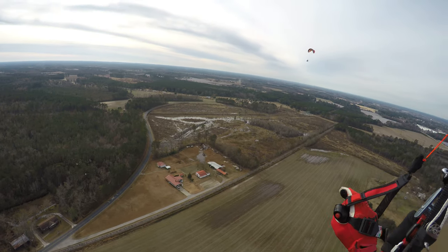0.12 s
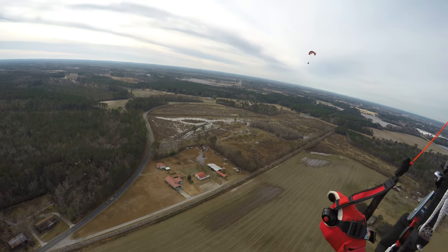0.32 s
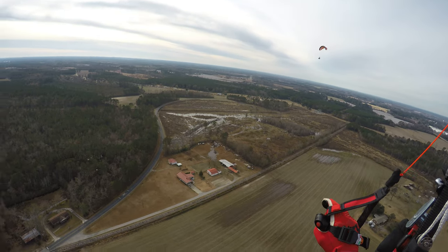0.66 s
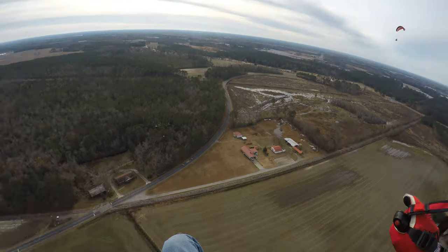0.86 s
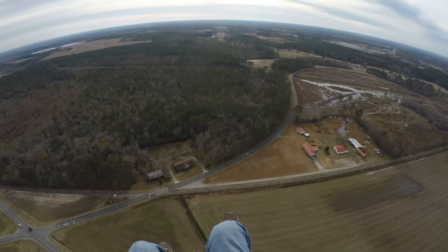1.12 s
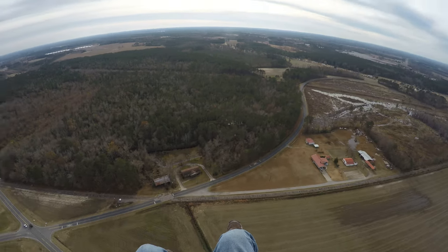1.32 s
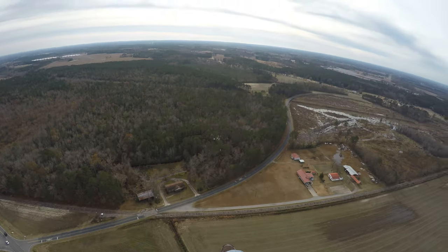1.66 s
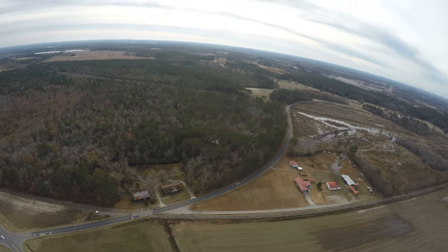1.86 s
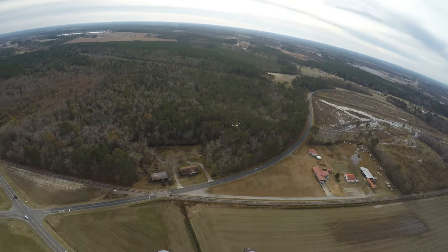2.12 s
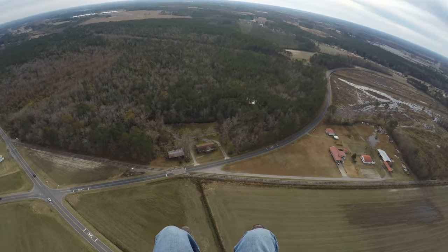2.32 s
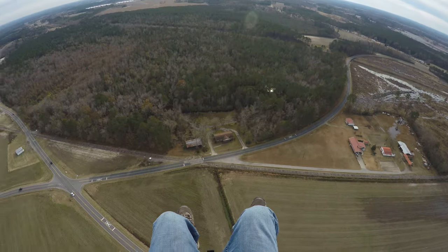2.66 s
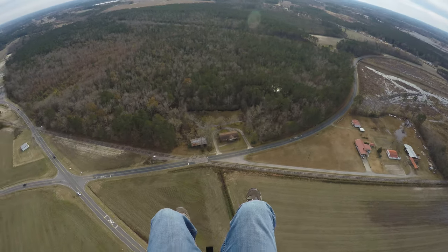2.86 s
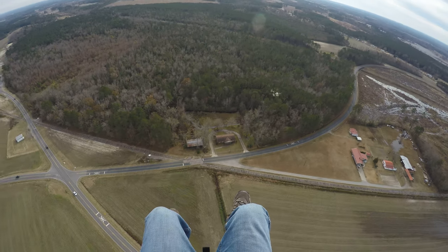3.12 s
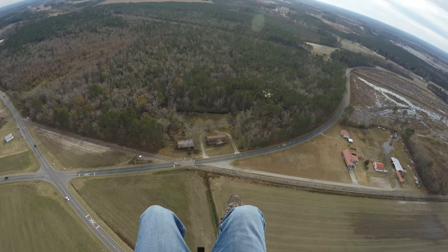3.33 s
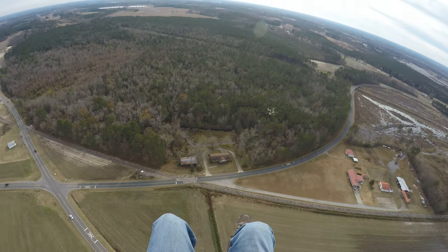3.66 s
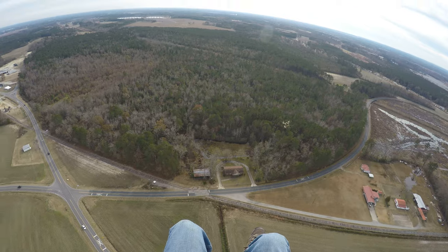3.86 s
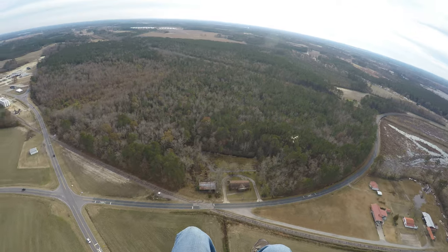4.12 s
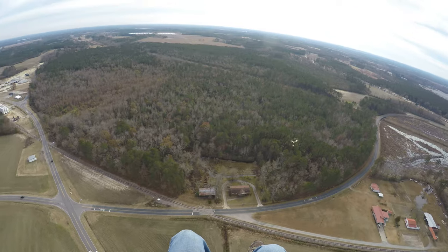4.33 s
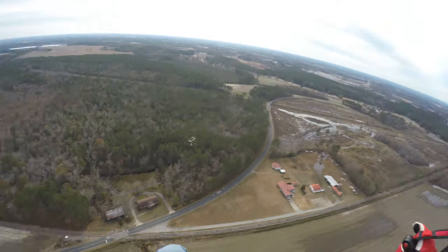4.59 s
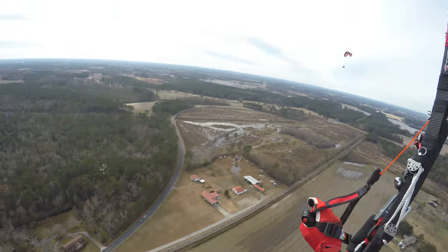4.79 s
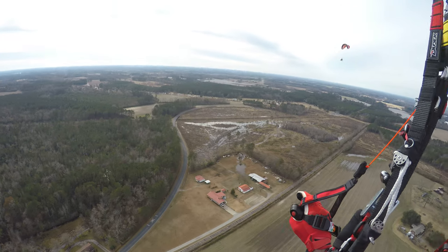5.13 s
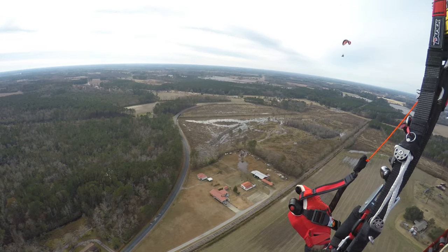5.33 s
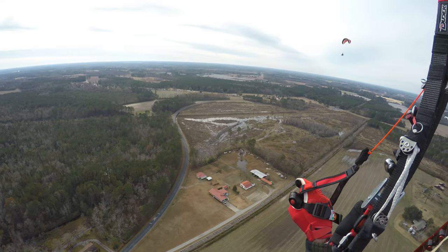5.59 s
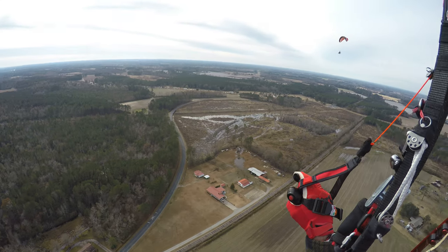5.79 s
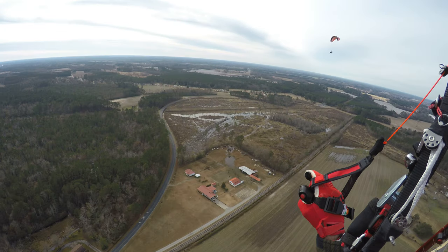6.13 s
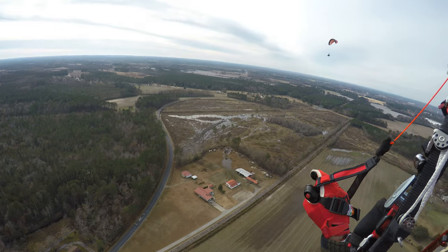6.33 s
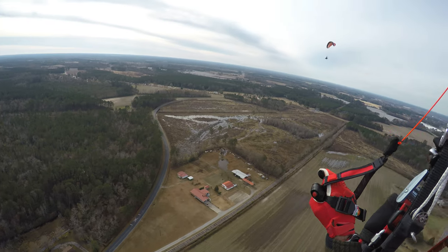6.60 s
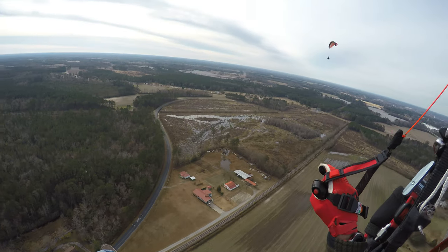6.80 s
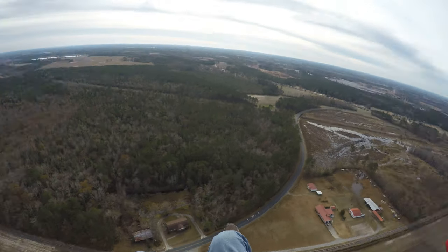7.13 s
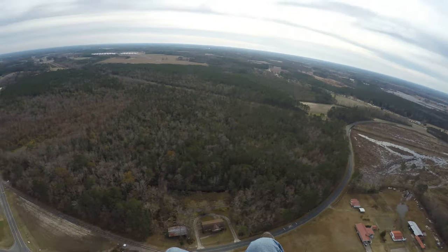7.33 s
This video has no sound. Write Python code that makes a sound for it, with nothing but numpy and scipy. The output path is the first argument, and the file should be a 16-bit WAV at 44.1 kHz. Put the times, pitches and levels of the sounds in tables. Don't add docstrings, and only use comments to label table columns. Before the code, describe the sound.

A small two-stroke engine drones without pause, a raspy buzz of about 70 to 77 pulses a second, muffled by a sealed helmet case in open air. From 0 to 0.9 s low wind rumbles and moans over it. Around 1 s the head turns with a soft low slap; wind drops away, and from 1.5 to 2.5 s the engine swells, louder and harsher, with metallic rattling and scattered knocks. From 2.6 to 3.9 s it settles into a steadier, slightly lower buzz. At 4.0 to 4.4 s a cluster of hard, dry knocks shakes the frame. By 4.8 s wind returns with low thumps, hollow and gusty through 7 s, over a quieter engine whose pitch slowly rises, with faint clicks. After 7.2 s wind fades and a bright, clattering engine surges until the end. Thin hiss, tiny rapid electronic ticks and a barely audible whine persist.

```python
import sys
import numpy as np
from scipy import signal
from scipy.fft import rfft, irfft, next_fast_len
from scipy.io import wavfile
from scipy.ndimage import uniform_filter1d

SR = 44100
rng = np.random.default_rng(int(sys.argv[2]) if len(sys.argv) > 2 else 0)


def ratio_of_db(decibels):
    return 10 ** (np.asarray(decibels, float) / 20)


def int16_out(signal):
    q = np.round(np.clip(np.atleast_2d(signal).T, -1, 1) * 32767)
    wavfile.write(sys.argv[1], SR, q.astype(np.int16))


N = 329030
T = np.arange(N) / SR
FAST = next_fast_len(N)


def curve(rows):
    s, *columns = np.transpose(rows)
    return [np.interp(T, s, c) for c in columns]


def evened(x):
    return x / np.sqrt(np.mean(x ** 2, -1, keepdims=True) + 1e-20)


def coloured(x, points):
    f, db = np.transpose(points)
    hz = np.fft.rfftfreq(FAST, 1 / SR)
    gain = ratio_of_db(np.interp(np.log(hz + 1), np.log(f + 1), db))
    return irfft(rfft(x, FAST) * gain, FAST)[..., :N]


def wander(top_hz, count=1, size=N):
    knots = rng.standard_normal((count, 4000))
    hz = np.fft.rfftfreq(4000, T[-1] / 4000)
    lowpass = (hz > 0) / (1 + (hz / top_hz) ** 4)
    slow = evened(irfft(rfft(knots) * lowpass, 4000))
    at = np.linspace(0, 3999, size)
    return np.array([np.interp(at, np.arange(4000), s) for s in slow])


def resonate(x, hz, width):
    carrier = np.exp(2j * np.pi * np.cumsum(hz * np.ones(N)) / SR)
    r = np.exp(-np.pi * width / SR)
    return 2 * (carrier * signal.lfilter([1 - r], [1, -r], x / carrier)).real


def ring(hz, t60, rise_s=.0007):
    t = np.arange(1500) / SR
    envelope = ratio_of_db(-60 * t / t60) * (1 - np.exp(-t / rise_s))
    return envelope * 2 * np.sin(2 * np.pi * hz * t)


def head():
    hold_s = [0, .82, 1.1, 1.55, 1.75, 2.25, 2.6, 3.1, 3.6, 4.62, 5.0, 6.2, 6.55, 7.25, 7.37]
    held = [0, 0, 1, 1, 2, 2, 3, 3, 4, 4, 5, 5, 6, 6, 7]
    return np.array([np.interp(T, hold_s, np.equal(held, k)) for k in range(8)])


def buffeting():
    # start in seconds, extra rattle in dB, length in seconds.
    bumps = [(1.387, 7, 0.29), (1.593, 3, 0.061), (1.837, 6.5, 0.032), (1.982, 0, 0.036), (2.08, -4, 0.047),
             (2.447, 14, 0.026), (3.99, 13, 0.07), (4.132, 15, 0.044), (4.177, 14, 0.09),
             (4.343, 16, 0.055), (4.44, 7, 0.06), (4.545, 10, 0.037), (6.124, -1, 0.041), (6.878, 15.5, .1),
             (7.31, 4, 0.045)]
    rise_s = 0.0087
    shaking = np.zeros(N)
    for s, db, length in bumps:
        rise = np.clip((T - s) / rise_s, 0, 1)
        shaking += db * rise * np.exp(-(np.maximum(T - s, 0) / length) ** 2)
    return shaking


def engine():
    # time in seconds, firing rate in Hz.
    speed = [(0.0, 71.83), (0.64, 71.91), (0.89, 73.08), (1.2, 74.1), (1.49, 74.52), (1.74, 75.31),
             (2.18, 74.09), (2.55, 73.24), (2.95, 72.05), (3.47, 71.15), (4.49, 70.92), (4.78, 70.06),
             (4.97, 71.21), (5.3, 72.65), (5.63, 73.7), (6.55, 76.04), (6.7, 75.46), (7.46, 76.62)]
    # time in seconds, engine level in dB.
    shading = [(0.0, -56), (0.41, -57.5), (0.62, -57), (0.95, -57.5), (1.16, -59.5), (1.58, -55),
               (1.85, -50.5), (2.16, -49.5), (2.66, -53), (3.61, -53), (4.1, -51.5), (4.43, -50.5),
               (4.78, -54), (5.3, -57.5), (6.11, -55), (6.63, -56), (7.19, -55.5), (7.46, -51)]
    # time in seconds, lateness in turns.
    delay = [(0, -.05), (.69, .12), (1.1, .2), (1.77, .3), (2.7, .34), (4.6, .32), (4.93, .14), (6.1, .13),
             (6.6, .17), (7.13, .13), (7.46, .18)]
    # level against the engine in dB,
    # one for each head position.
    tone_levels = [-4, 0, -1, -2.5, -2.5, -6, -3.5, 3]
    puff_levels = [-4.5, -1, -6, -3, -3, -7, -4.5, -9]
    rattle_levels = [-8, -4.5, 3, -4.5, -4.5, -2, -7.5, 6.5]
    treble_levels = [-12, 2, -13, -12, -12.5, -16.5, -25, -7]
    turns = np.cumsum(curve(speed)[0]) / SR - curve(delay)[0]
    shares = head()
    balance = np.array([tone_levels, puff_levels, rattle_levels, treble_levels]) @ shares
    tone_db, puff_db, rattle_db, treble_db = balance
    shaking = buffeting() + 1.0 * wander(8., count=2)
    body = np.sqrt(2) * ratio_of_db(tone_db) * exhaust_tone(turns, shares) + ratio_of_db(puff_db) * exhaust_puffs(turns)
    left = shares[2] + shares[7]
    rattle = clatter(turns, rattle_db + .75 * shaking[0], treble_db + .95 * shaking[1], left)
    struck = ratio_of_db(0.43 * shaking[0]) * blows(turns, shares)
    return ratio_of_db(curve(shading)[0] + 2.5) * (body + rattle + struck) + knocks()


def exhaust_tone(turns, shares):
    # multiple of the firing rate, level in dB.
    right_a = [(1, -14), (2, -12), (3, -18), (4, -14), (5, -13), (6, -7), (7, -4.5), (8, -14), (9, -7.5),
               (10, -0.5), (11, -7.5), (12, -5), (13, -6.5), (14, -14), (15, -8.5), (16, -12), (17, -15),
               (18, -11), (19, -8), (20, -8.5), (21, -13), (22, -3), (23, -20), (24, -6), (25, -24),
               (26, -28), (27, -12), (28, -31), (29, -22), (30, -12)]
    turning = [(1, -18), (2, -28), (3, -27), (4, -11), (5, -7), (6, -3), (7, -9), (8, -2), (9, -8.5),
               (10, -10), (11, -2.5), (12, 0), (13, -16), (14, -7), (15, -8), (16, -7), (17, -11), (18, -8),
               (19, -1.5), (20, -13), (21, -3.5), (22, -11), (23, -10), (24, -29), (25, -24), (26, -31),
               (27, -9), (28, -7), (29, -19), (30, -6)]
    left_a = [(1, -20), (2, -16.5), (3, -16), (4, -12.5), (5, -5.5), (6, -4.5), (7, -6), (8, -4), (9, -32),
              (10, -9), (11, 1), (12, -19), (13, 2), (14, -17), (15, 3.5), (16, -4.5), (17, -16), (18, -15),
              (19, -16), (20, -5), (21, -25), (22, -16), (23, -23), (24, -11), (25, -4), (26, -6),
              (27, -19), (28, -20), (29, -19), (30, -3.5)]
    down_a = [(1, -22), (2, -18.5), (3, -17.5), (4, -9), (5, -4), (6, -3.5), (7, -5.5), (8, -0.5), (9, -7),
              (10, -6), (11, 1.5), (12, -2.5), (13, -30), (14, -6), (15, -2), (16, -9), (17, -12),
              (18, -14), (19, -17), (20, -6.5), (21, -5), (22, -8), (23, -13), (24, -23), (25, -27),
              (26, -21), (27, -23), (28, -23), (29, -33), (30, -7.5)]
    down_b = [(1, -15), (2, -16.5), (3, -24), (4, -6), (5, -4), (6, 0), (7, 1.5), (8, -3.5), (9, -6.5),
              (10, -6), (11, 3), (12, 1.5), (13, -25), (14, -11.5), (15, 0), (16, -2.5), (17, -12),
              (18, -6), (19, -5.5), (20, -9.5), (21, -6.5), (22, -1), (23, -12), (24, -7), (25, -9),
              (26, -17), (27, -35), (28, -26), (29, -17), (30, -7)]
    right_b = [(1, -22), (2, -1), (3, -23), (4, -10.5), (5, -7.5), (6, -7), (7, -3.5), (8, -5), (9, -3.5),
               (10, -9.5), (11, -4), (12, -1), (13, -3.5), (14, 3), (15, 1.5), (16, -5), (17, -9.5),
               (18, -11.5), (19, -23), (20, -5), (21, -9), (22, -1), (23, -1.5), (24, -18), (25, -12),
               (26, -31), (27, -5), (28, -32), (29, -22), (30, -16)]
    right_c = [(1, -30), (2, -21), (3, -11), (4, -8.5), (5, -15), (6, -6), (7, -5.5), (8, -7), (9, -7.5),
               (10, -1), (11, -2.5), (12, -0.5), (13, -5), (14, -8), (15, -6), (16, -11), (17, -11),
               (18, -14), (19, -8), (20, -10), (21, -7), (22, -9), (23, -16), (24, -15), (25, -32),
               (26, -10), (27, -14), (28, -8), (29, -15), (30, -7)]
    left_b = [(1, -22), (2, -30), (3, -19), (4, -16), (5, -17), (6, -6.5), (7, -8), (8, -4.5), (9, -20),
              (10, -8), (11, -6), (12, -16), (13, -1), (14, -12), (15, 5.5), (16, -30), (17, -3), (18, -8),
              (19, -7), (20, -22), (21, -21), (22, -25), (23, -22), (24, -11), (25, -24), (26, -29),
              (27, -14), (28, -21), (29, -23), (30, -3)]
    positions = [right_a, turning, left_a, down_a, down_b, right_b, right_c, left_b]
    turns, shares = turns[::8], shares[:, ::8]
    gains = ratio_of_db(np.array(positions)[:, :, 1])
    gains /= np.linalg.norm(gains[:, 4:20], axis=1, keepdims=True)
    flutter = wander(55.0, count=30, size=len(turns))
    slip = wander(5.8, count=30, size=len(turns))
    multiple = np.arange(1, 31)[:, None]
    start = rng.random((30, 1)) * np.minimum(multiple / 9, 1) ** 2.5
    phase = multiple * (turns + .0035 * slip) - .6 * multiple + start
    lines = gains.T @ shares * ratio_of_db(2.1 * flutter) * np.cos(2 * np.pi * phase)
    return signal.resample_poly(lines.sum(0), 8, 1)[:N]


def exhaust_puffs(turns):
    # frequency in Hz, density in dB per Hz.
    puff_colour = [(120, -67), (200, -19), (390, -22.5), (427, -21.5), (672, -10), (788, -13), (934, -9.5),
                   (1070, -11), (3400, -15), (3900, -61), (6600, -120)]
    stroke_db = 2.0 * rng.standard_normal(int(turns[-1]) + 1)[turns.astype(int)]
    gate = .3 + ratio_of_db(stroke_db) * np.exp(-((turns + .22) % 1) / .25)
    return evened(coloured(gate * rng.standard_normal(N), puff_colour))


def blows(turns, shares):
    # place in turns, ring in Hz, t60 in seconds.
    impacts = [
        (.95, 2650, .0045),
        (.39, 2300, .006),
        (.76, 3000, .005),
        (.83, 1750, .008),
        (.4, 1300, .008),
    ]
    strength = [
        [-12, -19, -24, -16, -21, -9, -11, -15],
        [-15, -22, -11, -20, -15, -21, -21, -20],
        [-26, -15, -11, -16, -12, -26, -24, -17],
        [-16, -12, -12, -11, -12, -21, -12, -8],
        [-19, -21, -19, -21, -19, -11, -18, -21],
    ]
    spread_db, jitter = 2.4, .002
    strokes = np.arange(1, int(turns[-1]) - 1)
    out = np.zeros(N)
    for (place, hz, t60), gain in zip(impacts, ratio_of_db(np.array(strength) @ shares)):
        luck = np.clip(rng.standard_normal((len(strokes), 2)), -2, 2)
        train = np.zeros(N)
        at = np.searchsorted(turns, strokes + place + jitter * luck[:, 0])
        train[at] = ratio_of_db(spread_db * luck[:, 1])
        out += gain * evened(signal.oaconvolve(train, ring(hz, t60, .00025)[:500])[:N])
    return out


def clatter(turns, body_db, treble_db, left):
    # frequency in Hz, level in dB.
    part_colour = [(400, -24.5), (800, -16), (1500, -6), (2200, -1), (2600, 4), (3000, 13), (3500, 17)]
    # time in seconds, pitch in Hz, level in dB.
    cavity_path = [(1.2, 2570, -24), (1.5, 2150, 2), (1.85, 1938, -13), (2.2, 1770, -21), (2.5, 1470, 5),
                   (2.8, 1530, -6), (7.1, 1640, -31), (7.46, 1880, -7)]
    # pitch in Hz, width in Hz, level in dB.
    shell_modes = [
        (970, 29, -25),
        (1170, 120, -15),
    ]
    stroke = ratio_of_db(1.3 * rng.standard_normal(int(turns[-1]) + 1))[turns.astype(int)]
    firing = 1.1 * np.exp(-((turns + .24) % 1) / .14)
    rebound = .4 * np.exp(-((turns + .62) % 1) / .07)
    shaken = (.2 + firing + rebound) * stroke
    hits = rng.random(N) < 6000 * shaken / SR
    force = ratio_of_db(1.8 * np.minimum(rng.exponential(1, N), 3)) * hits
    part = rng.integers(0, 12, N)
    rings = np.zeros(N)
    for k, hz in enumerate(np.geomspace(600, 3500, 12)):
        rings += signal.oaconvolve(force * (part == k), ring(hz, 0.009))[:N]
    both = coloured(rings, part_colour)
    highpass = signal.butter(3, 2400, "high", fs=SR, output="sos")
    treble = signal.sosfiltfilt(highpass, both)
    cavity_hz, cavity_db = curve(cavity_path)
    cavity = ratio_of_db(cavity_db) * evened(resonate(resonate(both, cavity_hz, 210.0), cavity_hz, 260.0))
    shell = left * sum(ratio_of_db(db) * evened(resonate(rings, hz, width)) for hz, width, db in shell_modes)
    body = ratio_of_db(body_db - 6.5) * (evened(both - treble) + cavity)
    return shell + body + ratio_of_db(treble_db - 12.5) * evened(treble)


def knocks():
    # start in seconds, peak in dB, main ring in Hz, second ring in Hz.
    jolts = [(1.065, -37.5, 1960, 880), (1.602, -28, 2040, 825), (1.683, -35, 1930, 606),
             (1.711, -45, 1950, 740), (1.764, -34, 1220, 1300), (1.79, -37, 1950, 1130),
             (1.871, -35, 1900, 1120), (1.886, -30.5, 1000, 1900), (1.914, -40, 1000, 1950),
             (1.923, -33, 2950, 960), (1.972, -30, 2440, 990), (2.048, -40, 2880, 990),
             (2.059, -42, 1750, 960), (2.072, -37, 1780, 1110), (1.992, -31, 1300, 2900),
             (2.099, -31.5, 1150, 1780), (2.27, -35, 1530, 1100), (2.371, -35, 1600, 1150),
             (2.396, -31.5, 1525, 1124), (2.465, -29.5, 1670, 1110), (2.629, -40, 1680, 630.6),
             (2.699, -37, 789, 1512), (4.028, -30.5, 1400, 660), (4.054, -30, 2460, 1490),
             (4.139, -27, 1700, 3250), (4.166, -30, 3170, 1480), (4.177, -43, 680, 523),
             (4.18, -26, 1490, 655), (4.194, -34, 1310, 2850), (4.209, -39, 1900, 2870),
             (4.221, -27.5, 3020, 1440), (4.334, -31, 1440, 1130), (4.363, -31, 2880, 1580),
             (5.414, -42, 2470, 3200), (5.441, -38, 2580, 669), (5.469, -40, 2550, 3200),
             (5.551, -41, 2520, 3080), (5.633, -44, 2500, 3200), (5.904, -36.5, 3130, 2427),
             (6.118, -34.5, 2907, 2320), (6.761, -41, 980, 1530), (7.225, -32, 776, 1460),
             (7.238, -38, 732, 1470), (7.28, -37, 800, 1451), (7.306, -44, 1130, 2000),
             (7.331, -38, 796, 1800), (7.317, -34, 664, 2500), (7.354, -43, 1130, 1760),
             (7.434, -43, 1744, 1151), (7.448, -29, 1080, 1770)]
    out = np.zeros(N + 1500)
    for s, db, main_hz, second_hz in jolts:
        rings = ring(main_hz, .012, .0003) + ratio_of_db(-6) * ring(second_hz, .018)
        out[round(s * SR):][:1500] += ratio_of_db(db - 6.5) * rings
    return out[:N]


def wind():
    # time in seconds, level in dB, moan in Hz, moan against the rumble in dB.
    gusts = [(0.0, -55.5, 105, -2), (0.45, -58.5, 108, -2), (0.62, -55, 145, -4.5), (0.79, -53.5, 168, 4),
             (0.9, -58.5, 148, 2.5), (1.0, -63, 177, -21), (1.15, -69, 177, -7), (3.9, -69.5, 200, -2.5),
             (4.76, -62.5, 190.2, -15), (4.89, -54.5, 145, 4), (5.01, -58, 142, 9.5), (5.13, -56.5, 182, 9),
             (5.25, -55.5, 150, 6), (5.8, -53, 148, 4), (6.15, -54, 130, -2.5), (6.4, -52, 190, -3.5),
             (7.1, -55.5, 165, -8), (7.46, -70, 189.5, -17)]
    # frequency in Hz, density in dB per Hz.
    rumble_colour = [(8.8, -66), (15, -7), (43, -33), (91, -1.5), (147, 0), (309, -5), (378, -13.5),
                     (421, -10.5), (600, -8.5), (780, -73), (1320, -120)]
    # frequency in Hz, density in dB per Hz.
    air_colour = [(15, -5), (45, 5), (75, 2.5), (120, 5.5), (250, 3.5), (400, -7)]
    gust_hz = 7.7
    level_db, moan_hz, moan_db = curve(gusts)
    level_db = level_db + 0.1 * wander(gust_hz)[0]
    moan_hz = moan_hz * (1 + 0.02945 * wander(gust_hz)[0])
    moan_hz = moan_hz * (1 + .05 * wander(22.)[0])
    rumble = evened(coloured(rng.standard_normal(N), rumble_colour))
    eddies = np.sqrt(2) * np.cos(2 * np.pi * np.cumsum(moan_hz) / SR) * ratio_of_db(2.4 * wander(18.)[0])
    blur = resonate(rng.standard_normal(N), 1.1 * moan_hz, 95.0)
    blur = evened(resonate(blur, 1.12 * moan_hz, 120.0))
    air = ratio_of_db(-61.5) * evened(coloured(rng.standard_normal(N), air_colour))
    return ratio_of_db(level_db - 4.) * (rumble + ratio_of_db(moan_db) * (.8 * eddies + .6 * blur)) + air


def thumps():
    # centre in seconds, level in dB, half length in seconds.
    slaps = [
        (1.048, -66, .05),
        (4.84, -65, 0.044),
        (5.09, -68, 0.034),
        (5.692, -72, .03),
    ]
    hz, width = 55.4, 81
    low = evened(resonate(resonate(rng.standard_normal(N), hz, width), hz, width))
    return low * sum(ratio_of_db(db) * np.exp(-((T - s) / length) ** 2) for s, db, length in slaps)


def sensor_ticks():
    spike_s = [1.678e-3, 2.115e-3, 2.445e-3, 2.809e-3, 14.247e-3, 16.385e-3, 16.561e-3]
    spike_sign = [1, -1, -1, 1, -1, -1, 1]
    spike_db = [-60.5, -57.5, -60, -60.5, -56.5, -64.5, -61]
    # frequency in Hz, level in dB.
    leak_colour = [(3000, -39), (7000, -8), (10000, -14), (12300, -5.5), (13000, -3), (14000, -5),
                   (14900, 6), (15150, -3), (15260, 2), (15400, 3)]
    frame_hz, field_s = 29.97, 16.649e-3
    frames = np.arange(int(T[-1] * frame_hz) - 1)[:, None] / frame_hz
    fields = (frames + [0, field_s]).ravel()
    jitter_s = 4e-6 * rng.standard_normal((len(fields), 7))
    at = (fields[:, None] + spike_s + jitter_s).ravel() * SR
    height = (ratio_of_db(spike_db + 1.0 * rng.standard_normal((len(fields), 7))) * spike_sign).ravel()
    near = np.round(at).astype(int)[:, None] + np.arange(-24, 25)
    spikes = ratio_of_db(-82.0) * rng.standard_normal(N)
    np.add.at(spikes, near, height[:, None] * np.sinc(near - at[:, None]) * np.hanning(49))
    return ratio_of_db(15.0) * coloured(spikes, leak_colour) * ratio_of_db([[-3.6], [0]])


def electronics():
    # frequency in Hz, density in dB per Hz.
    hiss_colour = [(20, -0.5), (3000, 7), (7000, -2.5), (10200, 1.5), (12500, -1), (14300, -8),
                   (14650, -25), (14900, 10), (15400, -3.5)]
    hiss = ratio_of_db(-69.5) * evened(coloured(rng.standard_normal((2, N)), hiss_colour))
    whine = ratio_of_db(-91) * evened(resonate(rng.standard_normal(N), 7330, 27.0))
    return hiss + whine + sensor_ticks()


def thinned(faint, loud):
    # low edge in Hz, high edge in Hz.
    weak_bands = [
        (10150, 10300),
        (12830, 13000),
        (13650, 13800),
    ]
    hz, _, z = signal.stft(faint, SR, nperseg=1024)
    loud_z = signal.stft(loud[0], SR, nperseg=1024)[2]
    near = abs(loud_z[(hz > 2400) & (hz < 3600)]) ** 2
    near_db = 10 * np.log10(uniform_filter1d(near.sum(0), 3) + 1e-12)
    chance = np.repeat(rng.standard_normal((len(near_db), 4)), 2, 0)[:len(near_db)].T
    top_hz = np.clip(3750 + 58 * (near_db + 67) + 200 * chance[0], 3000, 4560) // 172 * 172
    kept = (hz[:, None] < 3500) | (hz[:, None] > top_hz)
    for (low, high), draw in zip(weak_bands, chance[1:]):
        inside = (hz > low) & (hz < high)
        kept &= ~(inside[:, None] & (draw > .3))
    return signal.istft(z * kept, SR, nperseg=1024)[1][:, :N]


def scene():
    return np.tile(engine() + wind() + thumps(), (2, 1))


def roll_off(x):
    return signal.sosfilt(signal.butter(12, 16430, fs=SR, output="sos"), x)


def record(dry):
    case_hz, left_lag_s, edge_hz = 3600, 124e-6, 15295
    hz = np.fft.rfftfreq(FAST, 1 / SR)
    late = np.exp(-2j * np.pi * hz * np.array([[left_lag_s], [0]]))
    case = 1 / np.sqrt(1 + (hz / case_hz) ** 70)
    sealed = irfft(rfft(dry, FAST) * late * case, FAST)[:, :N]
    mixed = sealed + thinned(electronics(), sealed)
    mixed = irfft(rfft(mixed, FAST) * (hz < edge_hz), FAST)[:, :N]
    return roll_off(mixed)


dry = scene()
out = record(dry)
int16_out(out)
```